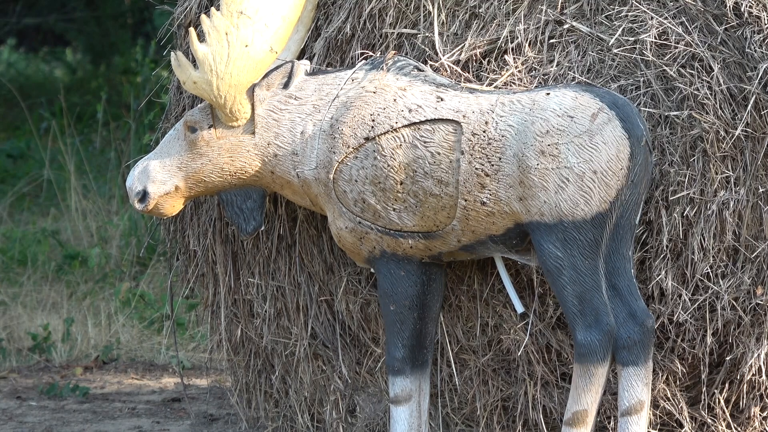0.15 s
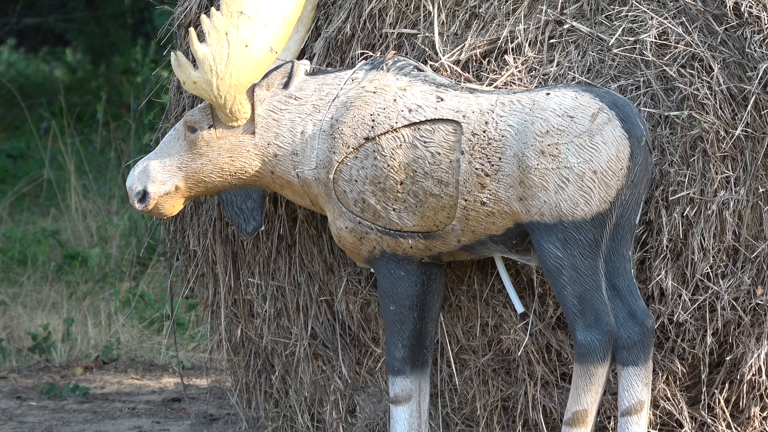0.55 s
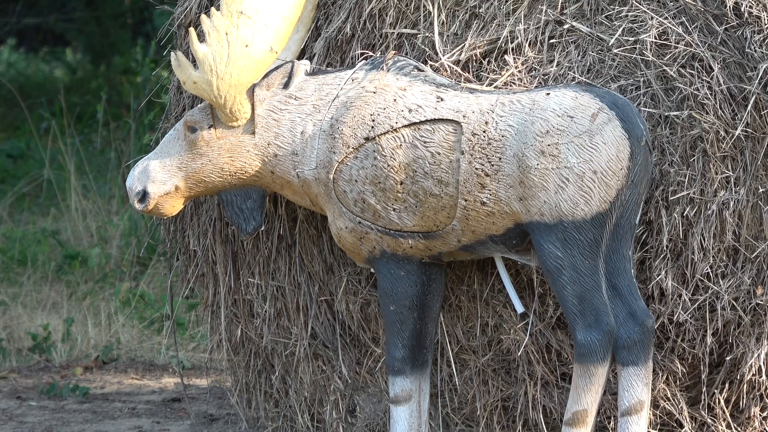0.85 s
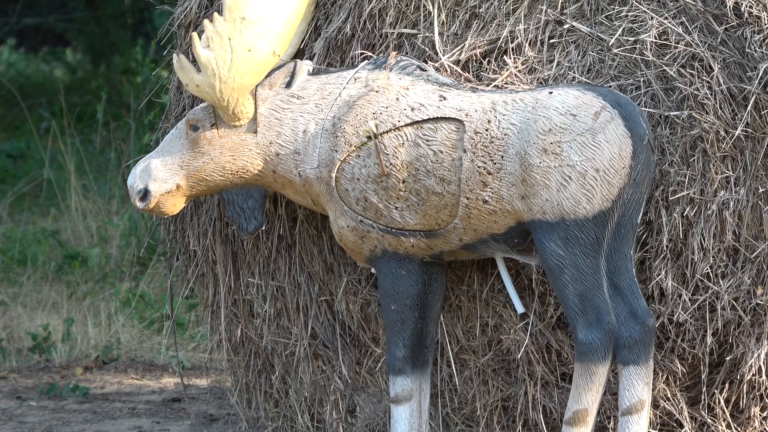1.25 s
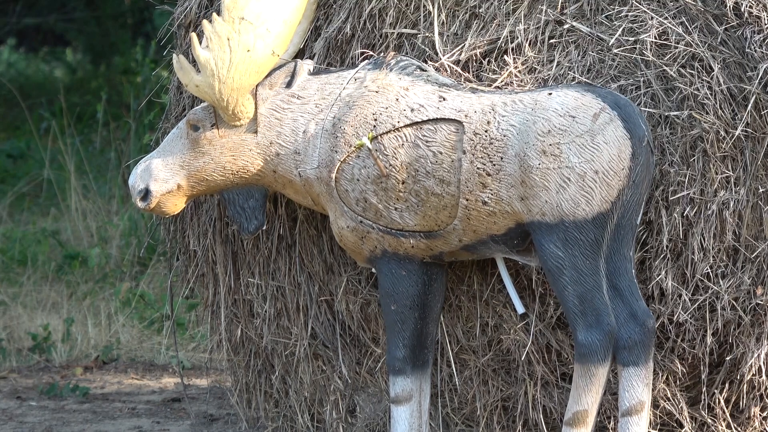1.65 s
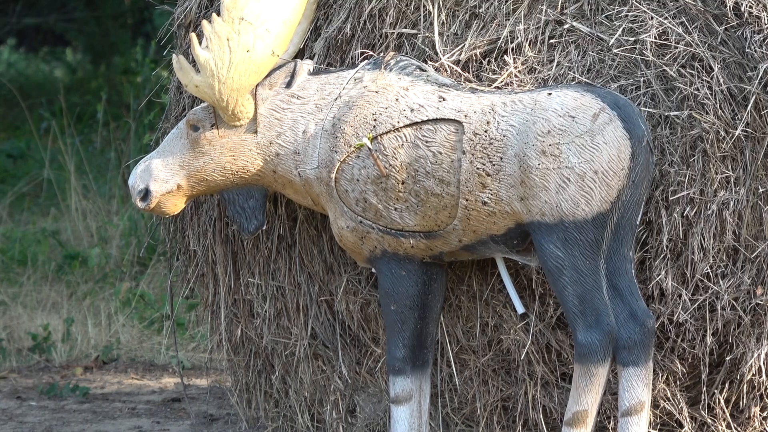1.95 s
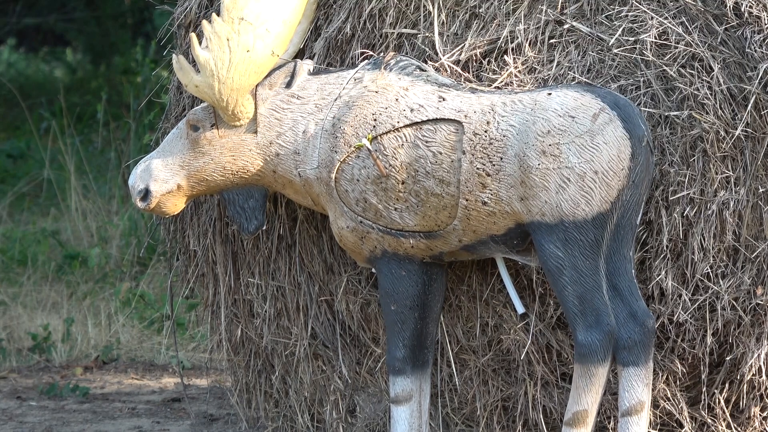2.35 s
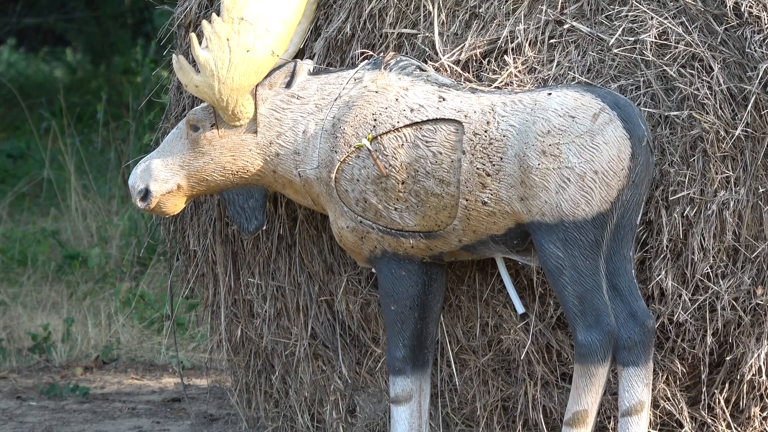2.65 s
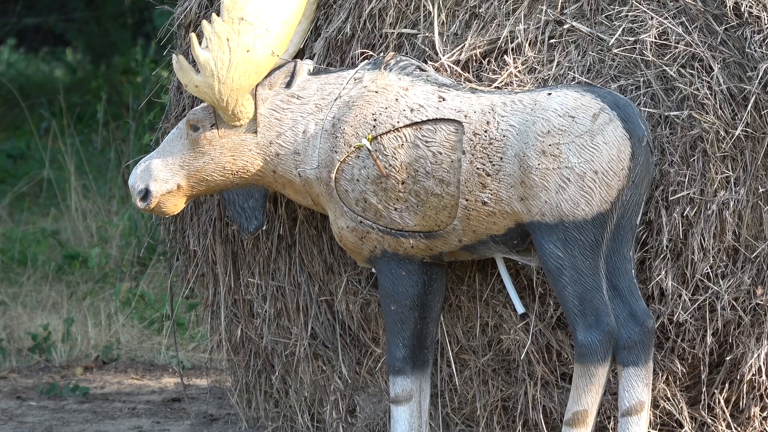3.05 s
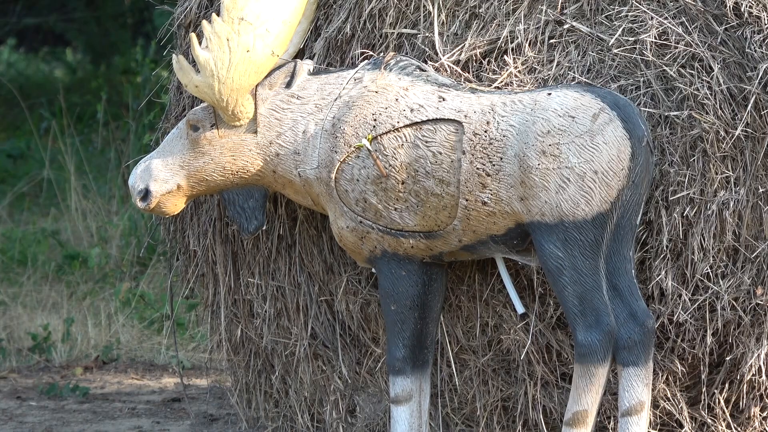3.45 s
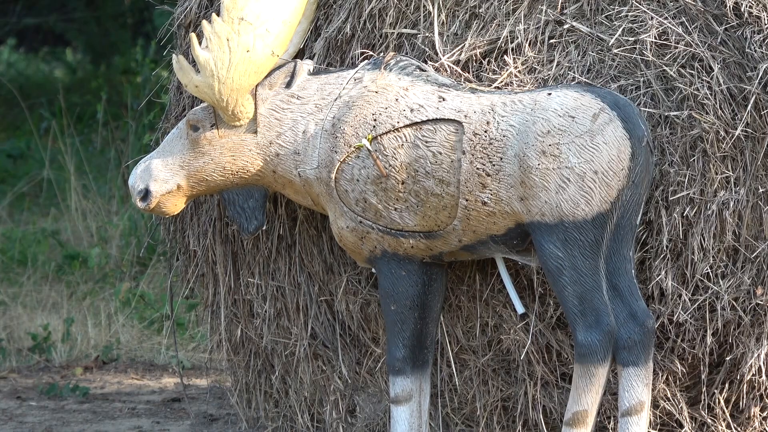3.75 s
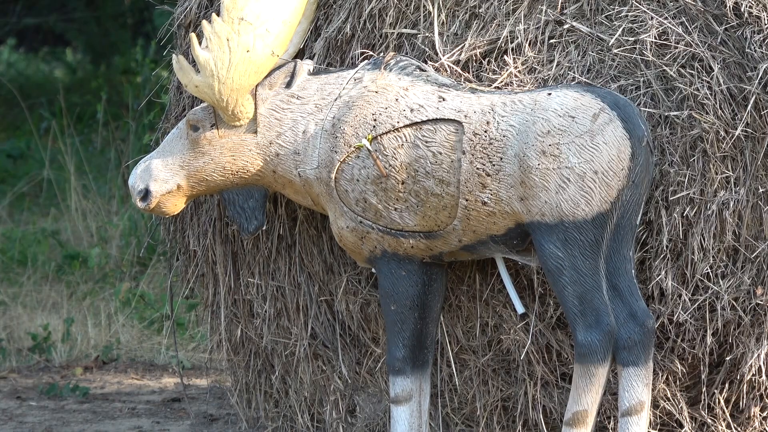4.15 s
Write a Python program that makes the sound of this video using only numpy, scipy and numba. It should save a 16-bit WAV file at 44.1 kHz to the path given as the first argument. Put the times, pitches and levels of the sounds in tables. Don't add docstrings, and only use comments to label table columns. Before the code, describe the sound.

Two loud knocks break a steady summer insect chorus: first a close bow release, its limbs ringing and string humming, then the hard, dull thump of an arrow in foam, echoing off fences. The archer then shifts about with soft rubbing, dry grass and twig ticks, while two brief bird notes sound. The single microphone sits by the bow and its level dips briefly under the shot.

```python
import sys
import numpy as np
from scipy import signal
from scipy.fft import rfft, irfft, next_fast_len
from scipy.io import wavfile
from scipy.ndimage import uniform_filter1d
from numba import njit

SR = 44100
rng = np.random.default_rng(int(sys.argv[2]) if len(sys.argv) > 2 else 0)


def boost_factor(decibels):
    exponent = np.asarray(decibels, float) / 20
    return 10 ** exponent


def materialize(psi):
    bounded = np.clip(np.atleast_2d(psi).T, -1, 1)
    quanta = np.round(bounded * 32767).astype(np.int16)
    wavfile.write(sys.argv[1], SR, quanta)


N = 189541
TIME = np.arange(N) / SR

# frequency in Hz, density in dB per Hz.
RUMBLE_SHAPE = [(12, -37), (20, -3), (67, -4.5), (119, -12), (208, -16), (242, -21), (275, -14.5),
                (307, -21.5), (400, -24), (520, -48), (880, -120)]
# frequency in Hz, width in Hz, level against the wash in dB.
DRONES = [(61.5, 11.3, -4.5), (156.7, 10.3, -14.5), (273.6, 12.3, -13.5), (482, 150, -16)]
# frequency in Hz, density in dB per Hz.
CHORUS_SHAPE = [(1290, -33), (2200, -17.5), (2650, -13), (2990, -5), (3370, -2), (4610, -1.5), (5260, -1),
                (5780, 2.5), (6470, 0.5), (7440, 0), (8610, -5), (10800, -24), (14000, -52), (22000, -120)]
# frequency in Hz, density in dB per Hz.
SHRILL_SHAPE = [(9000, -27), (10500, -12), (11800, 0.5), (12500, -1), (13300, -2.5), (14200, -8.5),
                (16000, -15), (18000, -40)]
# frequency in Hz, width in Hz, level against the chorus in dB, throb rate in Hz.
SINGERS = [(4356, 60, -26, 41), (5160, 50, -25, 55), (5630, 30, -24, 41), (5850, 40, -23, 41),
           (5945, 30, -23, 55), (6370, 60, -22, 82), (6550, 20, -21, 41), (6973, 22, -23, 55),
           (7180, 40, -25, 82), (7295, 30, -25, 41), (7690, 60, -25, 82), (8340, 40, -27, 55),
           (9271, 27, -33, 41)]
# start in seconds, length in seconds, lift of the highest voices in dB.
BOUTS = [
    (0.0, 0.35, 5),
    (1.15, 0.46, 4),
    (1.68, 0.52, 3.5),
    (2.45, 0.56, 4),
    (3.106, 0.37, 4.5),
    (3.71, 0.65, 2.5),
]
# middle in seconds, peak in dB.
TRILL = [
    (.008, -38),
    (.057, -35),
    (.102, -36.5),
    (.15, -35.5),
    (.198, -39),
]
# middle in seconds, half length in seconds, top in Hz, fall at the ends in Hz, level in dB.
BIRD_NOTES = [
    (2.797, .042, 2160, 250, -34),
    (3.435, .039, 2085, 200, -32),
]
# start in seconds, length in seconds, cloth in dB, grass against cloth in dB.
MOVES = [(.15, 0.096, -61, -2), (0.607, 0.2, -59, 2), (0.79, .04, -56, -6), (1.448, 0.49, -56.5, 2.5),
         (1.952, .2, -53, -5), (2.2, .1, -50, 1), (2.33, 0.19, -45.5, 1.5), (2.493, 0.16, -44, 1.5),
         (2.781, 0.11, -43, -0.5), (2.999, .28, -43, 3.5), (3.538, .12, -42.5, 0.5), (3.84, 0.15, -43, 2.5),
         (4.126, .05, -49, 5), (4.217, 0.087, -42, -6)]
# frequency in Hz, density in dB per Hz.
CLOTH_SHAPE = [(120, -7.5), (250, -4.5), (500, 2), (800, -1.5), (1300, -16), (3000, -24)]
# frequency in Hz, density in dB per Hz.
GRASS_SHAPE = [(300, -8), (700, -0.5), (1000, 4.5), (1500, 6.5), (2200, 0.5), (4000, -27), (9000, -55)]
# start in seconds, peak in dB, frequency in Hz.
TICKS = [(0.718, -34, 2000), (0.775, -34, 1790), (2.445, -28, 1470), (2.645, -23, 1220),
         (2.698, -21.5, 1400), (2.719, -25, 1600), (2.926, -33, 1350), (2.977, -29, 1980),
         (3.099, -35, 711), (3.187, -23, 1440), (3.278, -26, 1930), (3.378, -27.5, 1670),
         (3.527, -26, 1450), (3.686, -27, 1370), (4.079, -24, 2200), (4.247, -36, 433)]
# middle in seconds, half length in seconds, peak in dB.
SWISHES = [
    (3.115, .06, -38),
]
# frequency in Hz, level in dB, 60 dB decay in seconds.
SHAFT_MODES = [(575, -11, 0.049), (915, -9, 0.014), (1065, -8, 0.021), (1600, -15.5, .012),
               (1930, -8.5, 0.011)]
# frequency in Hz, level in dB, 60 dB decay in seconds.
FOAM_MODES = [(228, -34, 0.22), (339, -34, .2), (616, -38, 0.18), (1090, -39, 0.19)]
# delay in seconds, level in dB.
ECHOES = [
    (0.022, -15),
    (.036, -22),
    (.052, -22),
    (.074, -24),
    (.08, -34),
    (0.175, -23.5),
]
# frequency in Hz, level in dB, 60 dB decay in seconds.
RELEASE_MODES = [(403, -17, 0.037), (675, 3.5, 0.037), (730, -13, 0.05), (974, 4.5, 0.023),
                 (1100, -7, 0.027), (1275, -2.5, 0.032), (1450, -12, 0.055), (2100, -15, 0.027),
                 (3530, 2, 0.0076), (4300, -11, 0.01)]
# frequency in Hz, level in dB, 60 dB decay in seconds.
LIMB_MODES = [(151, -26, 1.3), (193, -13.5, 0.36), (230, -12, 0.18), (300, -15, 0.17), (408.6, -5, 0.31),
              (435, -13.5, 0.26), (479, -16.5, 0.27), (539, -18.5, 0.39), (663, -20.5, 0.37),
              (693, -37.5, 2.5), (1060, -31, 0.12)]
# frequency in Hz, level in dB, 60 dB decay in seconds.
RISER_MODES = [(368, -3, 0.2), (292, 1, 0.016)]

RELEASE_S, STOP_S, GRIP_S, HIT_S, THUD_S = .9465, .9646, 1.043, 1.2156, 1.2237
STRING_HZ, STRING_DB, STRING_T60_S, STRING_RISE_S = 95.6, -21.5, 1.4, .05
CHORUS_DB, SHRILL_DB, RUMBLE_DB = -24, -47, -45.5
RISE_DB_PER_S, SHRILL_SHARE, RUMBLE_SHARE = 1.5, .65, 0.41
BOUT_ATTACK_S, BOUT_RELEASE_S, BOUT_CHORUS_SHARE = 0.17, 0.073, 0.28
MOVE_ATTACK_S, MOVE_RELEASE_S, STILL_CLOTH_DB, STILL_GRASS_DB = 0.054, 0.21, -66, -55.5
DUCK_DB, DUCK_ATTACK_S, DUCK_HOLD_S, DUCK_RELEASE_S = -2, .02, 0.025, 0.064


def level(x, db):
    return x * boost_factor(db) / np.sqrt(np.mean(x ** 2))


def colour(x, shape):
    hz, db = np.transpose(shape)
    size = next_fast_len(N)
    bins_hz = np.arange(1, size // 2 + 2) * SR / size
    gain = boost_factor(np.interp(np.log(bins_hz), np.log(hz), db))
    return level(irfft(rfft(x, size) * gain, size)[:N], 0)


def band(x, hz, width):
    return signal.lfilter(*signal.iirpeak(hz, hz / width, SR), x)


def narrow_noise(hz, width):
    return band(band(rng.standard_normal(N), hz, width), hz, width)


def no_bass(x, hz):
    return signal.sosfilt(signal.butter(2, hz, "high", fs=SR, output="sos"), x)


def walk(rate):
    hold = int(SR / rate)
    steps = np.repeat(rng.standard_normal(N // hold + 1), hold)
    return 1.6 * uniform_filter1d(uniform_filter1d(steps, hold), hold)[:N]


def fade(start, t60):
    t = TIME - start
    return (t >= 0) * np.exp(-np.log(1000) * np.maximum(t, 0) / t60)


def bump(middle, half):
    return np.exp(-((TIME - middle) / half) ** 2)


def bout(start, length, attack, release):
    rise = np.clip((TIME - start) / attack, 0, 1)
    return rise * np.exp(-np.maximum(TIME - start - length, 0) / release)


def ring(start, modes, contact=.0001):
    t = TIME - start
    onset = 1 - np.exp(-np.maximum(t, 0) / contact)
    return onset * sum(boost_factor(db) * fade(start, t60) * np.sin(2 * np.pi * hz * t) for hz, db, t60 in modes)


def chirps(spread_db):
    cells = (1025, N // 512 + 6)
    size = boost_factor(spread_db * np.clip(rng.standard_normal(cells), -3, 2))
    phase = np.exp(2j * np.pi * rng.random(cells))
    return signal.istft(size * phase, nperseg=2048, noverlap=1536)[1][:N]


def flickering(shape, slow_db, quick_db, rate, chirpy=0.):
    x = rng.standard_normal(N) + chirpy * level(chirps(spread_db=7.0), 0)
    out = 0
    for hz in 25 * 2 ** np.arange(0, 9.5, 1 / 3):
        out = out + band(x, hz, hz / 4) * boost_factor(slow_db * walk(2.43) + quick_db * walk(rate))
    return colour(out, shape)


def rumble(db):
    wash = flickering(RUMBLE_SHAPE, slow_db=0.5, quick_db=2.2, rate=7.3)
    for hz, width, tone_db in DRONES:
        wash = wash + level(narrow_noise(hz, width) * boost_factor(2.0 * walk(1.38)), tone_db)
    return boost_factor(db) * wash


def insects(chorus_db, high_db, shrill_db):
    throb_hz = 41 * (1 + 0.035 * walk(2.77))
    throb = 1 + 0.004 * np.sin(2 * np.pi * np.cumsum(throb_hz) / SR)
    hiss = flickering(CHORUS_SHAPE, slow_db=1.1, quick_db=0.12, rate=45, chirpy=1.02) * boost_factor(0.18 * walk(150))
    high = signal.sosfiltfilt(signal.butter(4, 8000, "high", fs=SR, output="sos"), hiss)
    hiss = hiss + high * (boost_factor(high_db - high_db.mean()) - 1)
    for hz, width, db, rate in SINGERS:
        pulsing = 1 + 0.26 * np.sin(2 * np.pi * rate * TIME)
        hiss = hiss + level(narrow_noise(hz, width) * boost_factor(1.3 * walk(1.6)) * pulsing, db + 3.5)
    shrill = flickering(SHRILL_SHAPE, slow_db=1.5, quick_db=0.3, rate=60, chirpy=0.64)
    return throb * (boost_factor(chorus_db) * hiss + boost_factor(shrill_db) * shrill)


def cricket():
    tone = level(band(rng.standard_normal(N), 2390, 130), 0)
    return tone * sum(boost_factor(db) * bump(s, 0.008) for s, db in TRILL)


def bird():
    out = 0
    for s, half, hz, fall_hz, db in BIRD_NOTES:
        arch = np.clip((TIME - s) / half, -1.2, 1.2) ** 2
        loud = boost_factor(db + 1.0 * walk(120)) * np.clip(1 - arch, 0, 1)
        pitch_hz = hz - fall_hz * arch
        out = out + np.sqrt(2) * loud * np.sin(2 * np.pi * np.cumsum(pitch_hz) / SR)
    return out


def movement():
    cloth, grass = boost_factor(STILL_CLOTH_DB) ** 2, boost_factor(STILL_GRASS_DB) ** 2
    for s, length, cloth_db, grass_db in MOVES:
        power = bout(s, length, MOVE_ATTACK_S, MOVE_RELEASE_S) ** 2
        cloth = cloth + power * boost_factor(cloth_db) ** 2
        grass = grass + power * boost_factor(cloth_db + grass_db) ** 2
    return 10 * np.log10(cloth), 10 * np.log10(grass / cloth)


def rustle(cloth_db, grass_db):
    grains = rng.standard_normal(N) * boost_factor(1.3 * walk(60) + 1.5 * walk(400))
    cloth = flickering(CLOTH_SHAPE, slow_db=0.5, quick_db=1.5, rate=12)
    grass = colour(grains, GRASS_SHAPE)
    bright = colour(grains, [(1000, -16), (4000, -6), (10000, -3), (16000, -3)])
    ticks, snaps = 0, 0
    for s, peak_db, hz in TICKS:
        ticks = ticks + ring(s, [(hz, peak_db - 3.0, .03), (0.86 * hz, peak_db - 13, .025)])
        snaps = snaps + boost_factor(peak_db - 15) * fade(s, 0.012)
    brushed = sum(boost_factor(peak_db) * bump(s, half) for s, half, peak_db in SWISHES)
    rubbing = boost_factor(cloth_db) * (cloth + boost_factor(grass_db) * grass)
    return rubbing + ticks + snaps * (grass + cloth) + brushed * bright


def target():
    crack = no_bass(ring(HIT_S, SHAFT_MODES), hz=350)
    u = ((TIME - THUD_S) / 0.0013) ** 2
    push = boost_factor(0.5) * (1 - 2 * u) * np.exp(-u)
    dull = [(100, -8), (300, 5.5), (1000, -4), (2500, 0.5), (5000, -24)]
    scatter = colour(rng.standard_normal(N), dull)
    echoes = sum(boost_factor(db - 7.5) * fade(HIT_S + delay, 0.02) for delay, db in ECHOES)
    tail = boost_factor(-33.0) * fade(HIT_S, 0.48)
    return crack + push + ring(THUD_S, FOAM_MODES) + scatter * (echoes + tail)


def release(noise, gritty):
    slip = np.exp(-np.abs(TIME - RELEASE_S) / np.where(TIME < RELEASE_S, .0015, .004))
    crack = ring(RELEASE_S, RELEASE_MODES, contact=0.0011) + boost_factor(-10.5) * slip * (gritty + boost_factor(-20) * noise)
    sliding = (TIME > RELEASE_S) * np.exp(-np.abs(TIME - STOP_S) / np.where(TIME < STOP_S, .03, .012))
    scrape = boost_factor(-14.5) * sliding * (gritty + level(band(noise, 2200, 330), -1.1))
    return no_bass(crack, hz=250) + scrape


def limbs():
    riser = ring(STOP_S, RISER_MODES[1:]) - ring(STOP_S, RISER_MODES[:1])
    return no_bass(ring(STOP_S, LIMB_MODES) + riser, hz=70)


def string_slaps(noise):
    cycles = np.maximum(TIME - STOP_S, 0) * STRING_HZ
    once, twice = (np.exp(-((cycles + lag) % 1) / 0.09) for lag in (0, .5))
    return boost_factor(-15.5) * noise * boost_factor(1.5 * walk(160)) * fade(STOP_S, 0.59) * (0.098 + once + 0.56 * twice)


def string_hum():
    rise = 1 - np.exp(-(np.maximum(TIME - STOP_S, 0) / STRING_RISE_S) ** 4)
    lowered = 0.34 + 0.64 / (1 + np.exp((TIME - 1.385) / 0.015))
    swing = rise * fade(STOP_S, STRING_T60_S) * lowered
    return boost_factor(STRING_DB) * swing * np.sin(2 * np.pi * STRING_HZ * TIME)


def rattle():
    loose = rng.standard_normal(N) * boost_factor(1.2 * walk(130))
    body_shape = [(80, -8), (250, 4.5), (700, -1), (2000, -18.5), (3500, -9), (6000, -35)]
    spray_shape = [(700, -20), (1500, 6), (2500, 6), (4500, -4), (7000, -22)]
    body = boost_factor(-16) * fade(STOP_S, 0.54) * colour(loose, body_shape)
    spray = boost_factor(-27) * fade(STOP_S, 1.0) * colour(loose * boost_factor(1.7 * walk(300)), spray_shape)
    return body + spray


def bow():
    noise = rng.standard_normal(N)
    gritty = colour(noise, [(300, 0.0), (900, 1), (2400, -7), (4500, -3), (7000, -11), (16000, -32)])
    snap = boost_factor(-17.5) * (noise + gritty) * bump(STOP_S, 0.00081)
    grip = 1 / (1 + boost_factor(7.5) / (1 + np.exp(-(TIME - GRIP_S) / 0.0091)))
    gripped = (limbs() + string_slaps(noise) + rattle()) * grip
    return release(noise, gritty) + snap + gripped + string_hum()


def scene():
    rise_db = RISE_DB_PER_S * TIME
    high_db = sum(db * bout(s, length, BOUT_ATTACK_S, BOUT_RELEASE_S) for s, length, db in BOUTS)
    chorus_db = CHORUS_DB + rise_db + BOUT_CHORUS_SHARE * high_db
    chorus = insects(chorus_db, high_db, SHRILL_DB + SHRILL_SHARE * rise_db)
    yard = rumble(RUMBLE_DB + RUMBLE_SHARE * rise_db) + chorus + cricket() + bird() + rustle(*movement())
    dip = boost_factor(DUCK_DB * bout(STOP_S, DUCK_HOLD_S, DUCK_ATTACK_S, DUCK_RELEASE_S))
    mix = dip * yard + target() + boost_factor(1) * bow()
    return np.array([mix, mix])


@njit
def gain_control(x, top, ratio, attack, release):
    y, follower = np.empty(len(x)), 0.
    for i in range(len(x)):
        loud = abs(x[i])
        follower += (loud - follower) * (attack if loud > follower else release)
        y[i] = x[i] * min(1., (top / (follower + 1e-9)) ** (1 - 1 / ratio))
    return y


def roll_off(x):
    return signal.sosfilt(signal.butter(12, 15720, fs=SR, output="sos"), x)


def record(dry):
    ducked = gain_control(dry[0], 0.25, 2.33, 1 / (0.0019 * SR), 1 / (0.014 * SR))
    clipped = np.clip(ducked, -1, 1)
    return roll_off(np.array([clipped, clipped]))


dry = scene()
out = record(dry)
materialize(out)
```